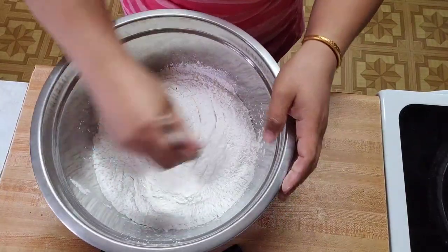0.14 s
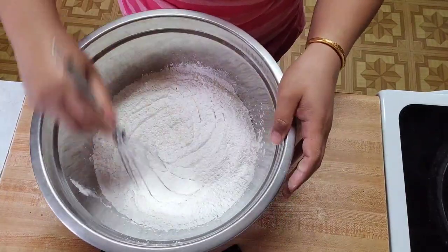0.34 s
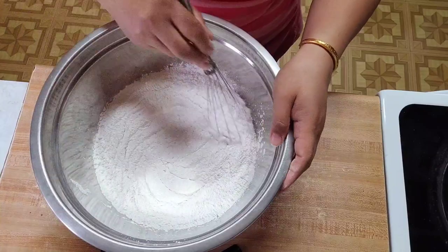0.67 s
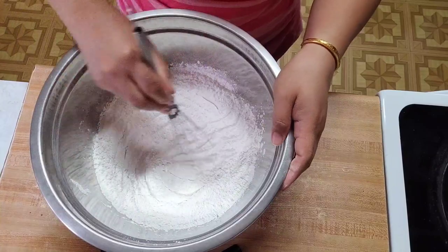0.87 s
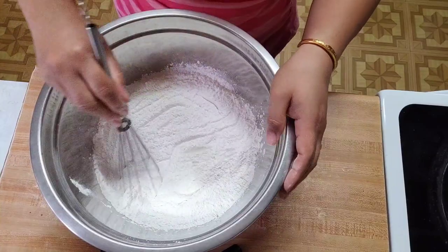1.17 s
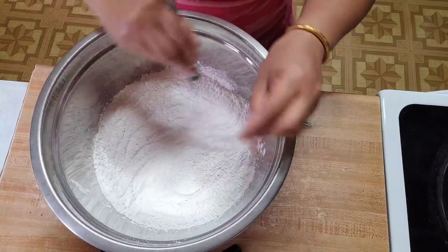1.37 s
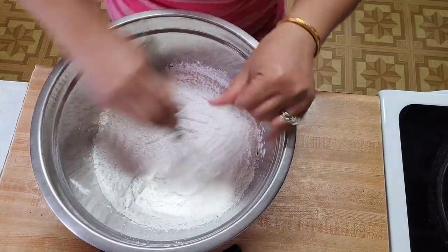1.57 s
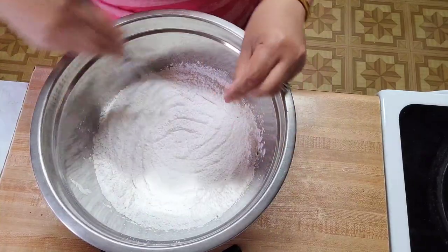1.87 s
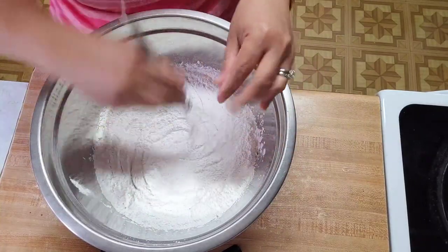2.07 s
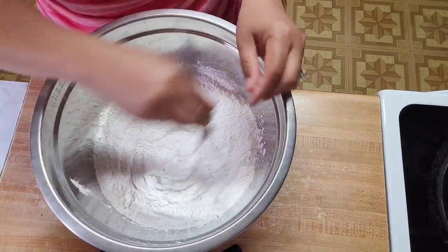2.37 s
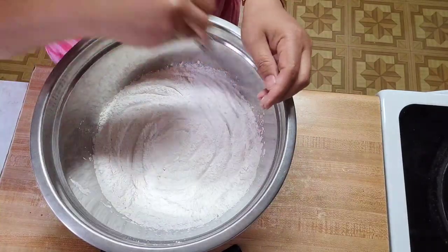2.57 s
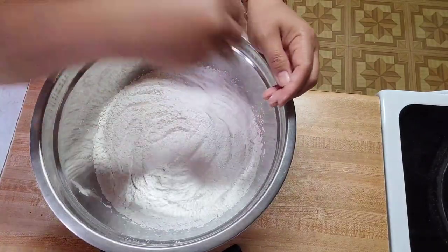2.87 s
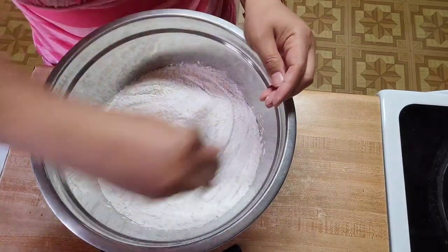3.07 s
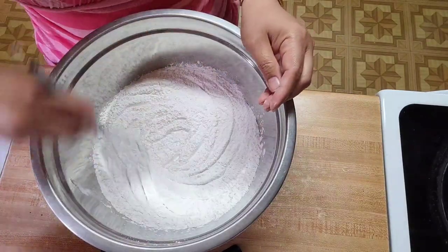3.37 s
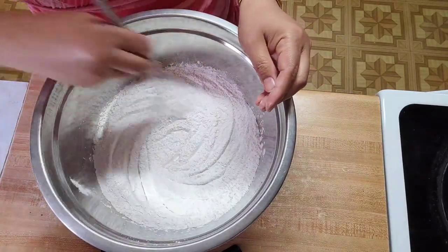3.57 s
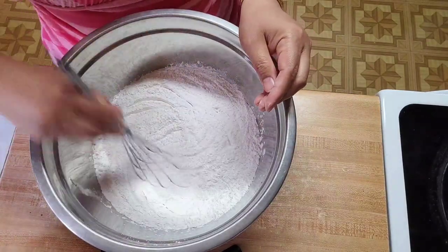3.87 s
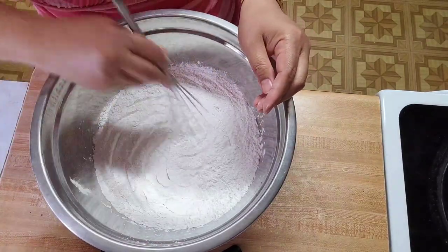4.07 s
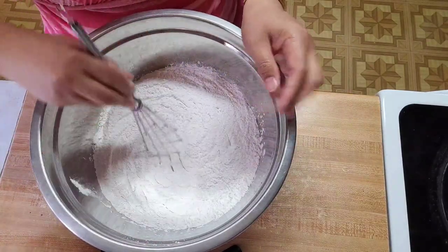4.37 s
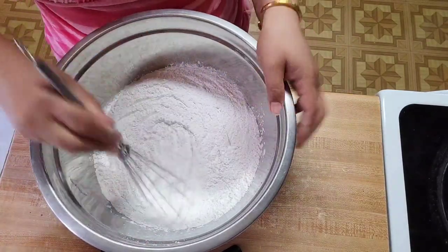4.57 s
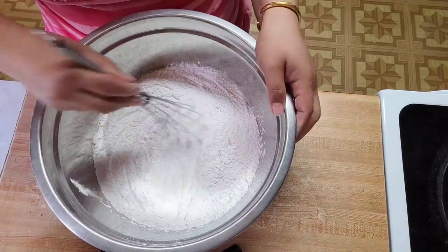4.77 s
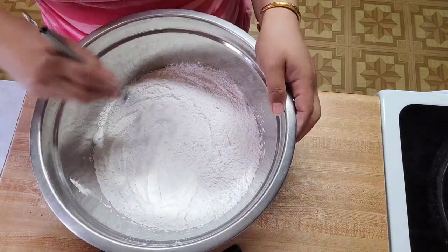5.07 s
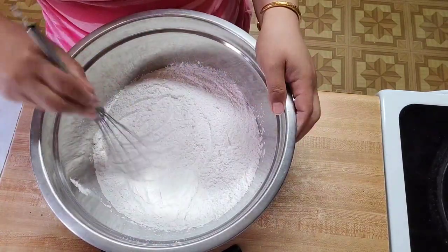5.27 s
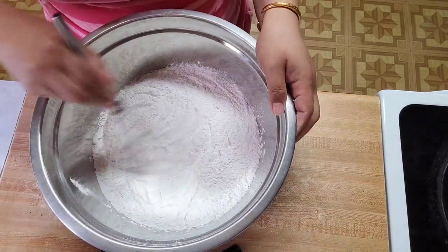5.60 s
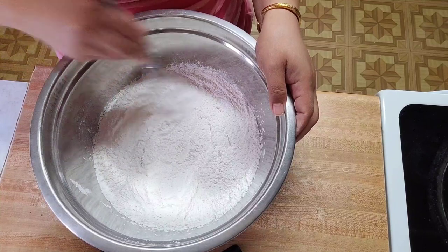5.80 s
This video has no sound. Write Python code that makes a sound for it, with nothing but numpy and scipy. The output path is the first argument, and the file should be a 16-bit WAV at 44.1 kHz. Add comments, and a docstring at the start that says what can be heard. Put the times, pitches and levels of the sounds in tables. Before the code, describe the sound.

A wire whisk stirs dry flour in a steel bowl, hissing softly, with irregular dull bowl knocks and bright metallic clicks.

```python
"""Wires hiss and scrape close by: a whisk circles through dry flour in a steel bowl on a wooden counter.
Random slips, filtered by flour, wire and bowl spectra, make the light drag and the louder swishes.
Hits add damped bowl modes, noise-burst taps and wire clicks with chatter; loops clink, the bowl rocks.
A small kitchen answers with decaying noise; sines under still air make an appliance hum."""
import sys
import numpy as np
from scipy import signal
from scipy.fft import rfft, irfft, next_fast_len
from scipy.io import wavfile
from scipy.ndimage import map_coordinates

SR = 44100
rng = np.random.default_rng(int(sys.argv[2]) if len(sys.argv) > 2 else 0)


def to_wav(sig):
    """Store sig (one row per channel, or 1-D mono) as 16-bit WAV at the path in sys.argv[1].

    Samples outside -1..1 are clipped; the rate is SR.
    """
    pcm = np.clip(np.atleast_2d(sig), -1, 1) * 32767
    pcm = np.round(pcm).astype(np.int16)
    wavfile.write(sys.argv[1], SR, pcm.T)  # frames by channels


N = 261948
AGE_S = np.arange(SR // 3) / SR  # time since a blow

# steel cracking on steel: freq_hz, level_db
CRACK_SPECTRUM = [(800, -12), (1500, -14.5), (2500, -8), (3500, -6.5), (4600, -1.5), (5800, 0), (7400, 6.5),
                  (8800, -3.5), (11300, 3), (14000, 1), (16000, 5)]
# whisk against wall, relative levels: start_s, knock_db, tap_db, click_db
WALL_HITS = [(0.181, -38, -54.5, -48.5), (0.358, -33.5, -47.5, -37.5), (0.517, -45.5, -88, -62),
             (0.932, -26.5, -43.5, -25), (1.206, -36.5, -64, -50.5), (1.348, -29.5, -56.5, -36.5),
             (1.606, -47, -69, -60), (1.704, -29.5, -41.5, -25.5), (1.959, -44, -57, -59.5),
             (2.203, -42, -53.5, -42), (2.481, -40, -66, -46.5), (3.105, -51.5, -65.5, -55),
             (3.229, -47.5, -59.5, -62), (3.353, -43.5, -73, -73), (3.504, -43.5, -61, -43.5),
             (3.571, -43, -71, -70), (3.812, -35.5, -43, -34.5), (4.303, -31, -44, -38),
             (4.712, -31.5, -60, -36), (4.81, -33, -55, -37.5), (5.137, -34.5, -50, -54),
             (5.425, -40.5, -56.5, -48.5), (5.533, -38, -61.5, -60), (5.787, -36.5, -54, -39.5),
             (5.836, -35.5, -50, -44), (5.901, -45, -66, -65)]


def amp(db):
    """Decibels to gain."""
    return 10 ** (np.asarray(db) / 20)


def unit(x):
    """Scale to rms 1."""
    return x / np.sqrt(np.mean(x ** 2) + 1e-20)


def blow(x):
    """Scale a blow to the energy of 10 ms at rms 1."""
    energy_ratio = np.mean(x ** 2) * x.shape[-1] / (SR * 0.01)
    return x / np.sqrt(energy_ratio + 1e-20)


def along(points, hz):
    """Interpolate (Hz, value) points on a log-frequency axis."""
    f, v = np.transpose(points)
    return np.interp(np.log(hz + 1), np.log(f), v)


def wobble(rate_hz):
    """Smooth random curve with rate_hz knots a second."""
    knots = rng.standard_normal(int(N * rate_hz / SR) + 4)
    return map_coordinates(knots, [np.arange(N) * rate_hz / SR])


def filtered(x, response):
    """Multiply the spectrum of x by a response of frequency."""
    n = x.shape[-1]
    m = next_fast_len(n + SR // 8)
    return irfft(rfft(x, m) * response(np.fft.rfftfreq(m, 1 / SR)), m)[..., :n]


def spread(pair):
    """Mix two signals to left and right; unrelated inputs get the tabled correlation."""
    # stereo correlation: freq_hz, likeness (0-1)
    likeness = [(60, 0.51), (250, 0.94), (550, 0.72), (1200, 0.097), (4000, 0.22), (12000, 0.054)]

    def mid_side_gains(hz):
        turn = np.arccos(np.clip(along(likeness, hz), 0, 1)) / 2
        return np.array([np.cos(turn), np.sin(turn)])

    mid, side = filtered(pair, mid_side_gains)
    return np.array([mid + side, mid - side])


def coloured(pair, spectrum):
    """Shape a pair by a (Hz, dB) spectrum, in stereo, at rms 1."""
    return unit(spread(filtered(pair, lambda hz: amp(along(spectrum, hz)))))


def resonances(peaks, hz):
    """Complex response of a body with (Hz, width Hz, dB) resonances of alternating sign."""
    total = 0
    for k, (centre_hz, width_hz, db) in enumerate(peaks):
        damping = 1j * hz * width_hz
        total = total + (-1) ** k * amp(db) * damping / (centre_hz ** 2 - hz ** 2 + damping)
    return total


def ripple(hz, depth_db, step_hz):
    """Random uneven response: every spot struck favours other frequencies."""
    knots = rng.standard_normal(400)
    return amp(depth_db * map_coordinates(knots, [hz / step_hz], order=1, mode="mirror"))


def burst(spectrum, attack_s, t60_s):
    """Decaying coloured noise: resonances too dense to tell apart."""
    noise = coloured(rng.standard_normal((2, len(AGE_S))), spectrum)
    return blow(noise * (1 - np.exp(-AGE_S / attack_s)) * amp(-60 * AGE_S / t60_s))


def ring(modes, attack_s, scatter_db, detune):
    """Damped sine modes; each blow lands elsewhere, so strengths and pitches vary."""
    hz, db, t60_s = np.transpose(modes)[..., None]
    size, shift, sign = rng.standard_normal((3, len(modes), 1))
    waves = np.sign(sign) * np.sin(2 * np.pi * hz * (1 + detune * shift) * AGE_S)
    decay = amp(db + scatter_db * size - 60 * AGE_S / t60_s)
    return blow(np.sum(waves * decay, 0) * (1 - np.exp(-AGE_S / attack_s)))


def grains(rate_hz, scatter_db):
    """Random tiny slips, simultaneous in two channels, with uneven sizes and signs."""
    chance, size, sign = rng.random(N), rng.standard_normal(N), rng.standard_normal((2, N))
    return (chance < rate_hz / SR) * amp(scatter_db * size) * sign


def add(track, start_s, sound):
    """Mix a sound into the track at start_s."""
    room = track[:, max(round(start_s * SR), 0):][:, :sound.shape[-1]]
    room += sound[..., :room.shape[1]]


def background():
    """Still kitchen air as coloured noise; appliance hum as sines with slight phase drift."""
    # still air: freq_hz, level_db
    air_spectrum = [(20, -24), (32, -2), (50, 1), (85, -1), (160, -6.5), (280, -0.5), (500, -7),
                    (800, -20.5), (1200, -33.5), (2000, -37), (5000, -50.5), (7000, -41.5), (9000, -45.5),
                    (16000, -38)]
    # appliance motor: freq_hz, relative_rms_db
    hum_partials = [(59.3, -54.5), (120, -70)]
    t = np.arange(N) / SR
    hum = np.zeros(N)
    for hz, db in hum_partials:
        phase = 2 * np.pi * hz * t + 0.073 * wobble(4.1)
        hum += amp(db) * np.sqrt(2) * np.sin(phase)
    return hum + amp(-61.0) * coloured(rng.standard_normal((2, N)), air_spectrum)


def kitchen(x):
    """Wall reflections as a noise tail, each frequency dying at its own speed."""
    # room decay: freq_hz, t60_s
    room_decay = [(100, 0.32), (500, 0.25), (2000, 0.31), (7000, 0.2), (15000, 0.24)]
    hz, t, z = signal.stft(rng.standard_normal((2, SR // 2)), SR, nperseg=256)
    decay = amp(-60 * t / along(room_decay, hz)[:, None])
    tail = signal.istft(z * decay, SR, nperseg=256)[1]
    tail = spread(tail / np.linalg.norm(tail[0]))
    late = np.pad(x.mean(0), (SR // 150, 0))  # 6.7 ms pre-delay
    return signal.fftconvolve(late[None], tail, axes=1)[:, :N]


def thump(db):
    """Bowl on counter: low damped modes with a slow onset."""
    # bowl rocking on counter: freq_hz, level_db, t60_s
    counter_modes = [(52.3, -15, 0.033), (65, 4.5, 0.17), (127, -6.5, 0.16)]
    return amp(db + 3.5) * ring(counter_modes, attack_s=0.005, scatter_db=1.5, detune=0.05)


def knock(db, tilt_db):
    """Dull bowl note: damped modes plus a thud, with tilt_db applied to the upper modes."""
    # bowl damped by flour and hand: freq_hz, level_db, t60_s
    bowl_modes = [(190.5, -8, 0.069), (277.6, -4.5, 0.1), (325, -8, 0.038), (369.5, 0, 0.092),
                  (418.7, -5.5, 0.049), (506, -4, 0.082), (577, 2, 0.049), (628, -6.5, 0.052),
                  (718.5, -11, 0.062), (888, -21, 0.055)]
    # dense part of the knock: freq_hz, level_db
    thud_spectrum = [(80, -27), (190, 0), (370, -8.5), (600, -5), (800, -7.5), (1050, -21), (3000, -34.5)]
    note = ring(bowl_modes, attack_s=0.0011, scatter_db=3.5, detune=0.029)
    note = note + amp(-5.0) * burst(thud_spectrum, attack_s=0.0012, t60_s=0.071)
    tilt = lambda hz: amp(tilt_db * along([(380, 0.047), (520, 0.96)], hz))
    return amp(db - 4.0) * blow(filtered(note, tilt))


def tap(db):
    """Hard wire-on-wall contact: a noise burst coloured by the spot struck."""
    # wire on wall: freq_hz, level_db
    contact_spectrum = [(500, -17), (900, 3.5), (1500, 7.5), (2100, -5), (2800, -8), (4500, -20),
                        (9000, -9.5)]
    spot = lambda hz: ripple(hz, depth_db=2.5, step_hz=125)
    return amp(db - 4.5) * filtered(burst(contact_spectrum, attack_s=0.0005, t60_s=0.1), spot)


def click(db, top_db, chatter_db):
    """Steel on steel: sharp bite and crack, ringing loops, then slower-rising chatter."""
    # wire loops: freq_hz, level_db, t60_s
    loop_modes = [(2479, -23, 0.18), (3480, 3.5, 0.08), (4650, 0.5, 0.033), (5030, -26, 0.033),
                  (6520, -9, 0.04), (7070, -14, 0.049), (7080, 10, 0.062), (7540, 6, 0.07),
                  (10300, -10, .05), (11036, 25.5, 0.12), (11700, -6, .05), (13400, -9, 0.032)]
    bite = amp(-8.5) * burst(CRACK_SPECTRUM, attack_s=0.00018, t60_s=0.029)
    crack = amp(-8.0) * burst(CRACK_SPECTRUM, attack_s=0.0015, t60_s=0.066)
    loops = np.array([ring(loop_modes, attack_s=0.0005, scatter_db=5, detune=0.0075) for _ in range(2)])
    chatter = amp(chatter_db) * burst(CRACK_SPECTRUM, attack_s=0.021, t60_s=0.18)

    def colour(hz):
        tilt_db = top_db * along([(4000, -0.69), (7500, 0.64), (10500, 0.83)], hz)
        return amp(tilt_db) * ripple(hz, depth_db=2.0, step_hz=379)

    return amp(db) * filtered(bite + crack + amp(-17.5) * spread(loops) + chatter, colour)


def contacts():
    """Hits excite bowl, counter and wires; clinks the wires alone; rocking the bowl and counter."""
    # loops against each other: start_s, relative_level_db
    clinks = [(0.284, -60), (0.503, -53), (0.76, -45), (2.171, -48), (2.882, -54.5), (2.994, -42),
              (3.231, -40.5), (3.344, -48), (3.406, -49)]
    # pushes rocking the bowl: start_s, relative_thump_db
    rocks = [(0.85, -46), (1.312, -45.5), (1.649, -46.5), (2.21, -40.5), (3.749, -37.5), (3.786, -41.5),
             (4.212, -40), (4.259, -45.5), (4.436, -52), (4.713, -38)]
    track = np.zeros((2, N))
    for s, knock_db, tap_db, click_db in WALL_HITS:
        # flour softens the tap and dulls the upper bowl modes with it; bare steel from -56 dB
        tilt_db = -3 + 0.52 * min(tap_db + 56, 0)
        add(track, s, knock(knock_db, tilt_db) + tap(tap_db) + thump(knock_db - 12))
        # wires click 3 ms later, treble dulled by flour
        add(track, s + 0.003, click(click_db, top_db=-6.5, chatter_db=-16.5))
    for s, db in clinks:
        add(track, s, click(db, top_db=1, chatter_db=-12.5))  # bare wire is bright
    for s, db in rocks:
        # a push hardly stirs the upper modes
        add(track, s, thump(db) + knock(db - 9, tilt_db=-5))
    return track


def powder_hiss(pressure):
    """Wires shear powder: dense slips with the flour's spectrum, swelling with pressure."""
    # sheared flour: freq_hz, level_db_per_hz
    flour_spectrum = [(300, -28), (1200, -20), (2500, -20), (4000, -21), (6000, -8.5), (7600, -6.5),
                      (8700, -9), (10500, -5.5), (12300, -3), (14000, -4), (16000, -7)]
    powder = grains(rate_hz=5000, scatter_db=3)
    return coloured(powder, flour_spectrum) * amp(1.5 + 1.46 * pressure)


def ticks(rate_hz):
    """A sliding wire catches and snaps free at random moments; rms 1."""
    snap = burst(CRACK_SPECTRUM, attack_s=0.00023, t60_s=0.015)
    return unit(signal.fftconvolve(grains(rate_hz, scatter_db=6.5)[:1], snap, axes=1)[:, :N])


def steel_scrape(pressure):
    """Slips ring the steel resonances under a sliding wire; sparse ticks on top."""
    # steel under a wire: freq_hz, width_hz, level_db
    steel_peaks = [(4517, 68, 2.5), (5410, 1760, -3.5), (6070, 173, 4), (6310, 370, -2.5),
                   (7220, 170, -3.5), (7476, 270, -11.5), (7413, 350, 3.5)]
    slips = grains(rate_hz=3000, scatter_db=2.0)
    scrape = unit(spread(filtered(slips, lambda hz: resonances(steel_peaks, hz))))
    return scrape * amp(0.46 + 0.38 * pressure) + amp(-11.5) * ticks(rate_hz=37)


def bowl_grit(pressure):
    """Slips ring the wall as grit and the bowl as a lower rub."""
    # bowl wall under a wire: freq_hz, width_hz, level_db
    wall_peaks = [(1115, 100, -1.5), (1294, 47, 4.5), (1500, 140, -7.5), (1960, 540, -9), (2825, 134, -4),
                  (3485, 99, 2.5), (4320, 250, -0.5)]
    # rubbed bowl: freq_hz, level_db
    rub_spectrum = [(60, -38), (130, 1), (200, -3), (310, 5), (450, -3), (620, -2.5), (900, -12),
                    (1400, -35), (3000, -42), (8000, -47)]
    slips = grains(rate_hz=1500, scatter_db=-2)
    grit = unit(spread(filtered(slips, lambda hz: resonances(wall_peaks, hz))))
    rub = coloured(grains(rate_hz=2500, scatter_db=4.0), rub_spectrum)
    rub_db = 5.5 + 1.3 * pressure + 1.5 * wobble(25.4)
    return grit * amp(-3.0 + 1.0 * pressure) + rub * amp(rub_db)


def stirring():
    """Light drag, swishes and after-hit skids gate the same hiss, scrape and grit."""
    # swishes: peak_s, relative_hiss_db, length_s, scrape_offset_db
    swishes = [(0.01, -72, 0.034, 8), (0.307, -68, 0.065, 6), (0.586, -62, 0.062, -4),
               (1.004, -58, 0.033, -22), (1.434, -78, 0.049, 0), (1.634, -68.5, 0.17, -4),
               (1.762, -67.5, 0.067, 3), (1.926, -56, 0.058, -8), (2.056, -59, 0.049, -24),
               (2.191, -51.5, 0.04, -6.5), (2.345, -68, 0.072, -37), (2.506, -46.5, 0.026, -7),
               (2.613, -49, 0.082, -8), (2.948, -75.5, 0.089, 11), (3.112, -48.5, 0.063, -6.5),
               (3.256, -48, .042, -3), (3.463, -60, .035, -5), (3.552, -53.5, 0.038, -4.5),
               (3.894, -68.5, 0.25, -4.5), (4.443, -66.5, 0.047, -6.5), (4.535, -69, 0.038, -4.5),
               (5.497, -55, 0.063, -2.5), (5.847, -59.5, 0.06, -8)]
    # drag between swishes: time_s, relative_level_db
    drag_curve = [(0.0, -70.5), (0.48, -63), (1.19, -77), (1.85, -68), (2.45, -83.5), (2.58, -69),
                  (3.32, -59), (3.67, -67.5), (3.95, -69), (5.19, -85), (5.84, -82), (5.94, -59)]
    rise_share, fall_share = 0.67, 1.047  # shares of length to -10 dB
    usual_hiss_db, grit_offset_db, grit_growth = -61, -8, 0.47  # grit grows more slowly than hiss
    pressure = wobble(70)  # one loop after another digs in
    hiss, scrape, grit = powder_hiss(pressure), steel_scrape(pressure), bowl_grit(pressure)
    now_s = np.arange(N) / SR
    drag = amp(np.interp(now_s, *np.transpose(drag_curve)) - 6.5)
    track = drag * (hiss + amp(-1) * scrape + amp(-6) * grit)
    # wires skid on 32 ms after each hit
    skids = [(s + 0.032, knock_db - 37, 0.04, -1.5) for s, knock_db, _, _ in WALL_HITS]
    for s, db, length_s, steel_db in swishes + skids:
        part = slice(max(round(s * SR) - SR // 4, 0), round(s * SR) + SR // 3)
        t = (now_s[part] - s) / length_s
        rise = np.abs(t / rise_share) ** 2.6
        fall = np.abs(t / fall_share) ** 1.53
        swell = amp(-10 * np.where(t < 0, rise, fall))
        grit_db = usual_hiss_db + grit_offset_db + grit_growth * (db + steel_db - usual_hiss_db)
        stroke = amp(db) * hiss[:, part] + amp(db + steel_db) * scrape[:, part]
        stroke = stroke + amp(grit_db) * grit[:, part]
        track[:, part] += filtered(swell * stroke, lambda hz: ripple(hz, depth_db=2.5, step_hz=257.7))
    return track


def scene():
    """Whisk, room and background; direct sound arrives right first, and the right is louder overall."""
    # stereo lean of whisk and room: freq_hz, extra_left_re_right_db
    lean = [(250, 2.5), (500, 1), (1500, 1.2), (3000, 2), (5000, 2), (7500, -3), (10000, 1)]
    lag_s, left_re_right_db = 3 / SR, -3.03
    sides = np.array([[0.5], [-0.5]])  # left, right
    whisk = stirring() + contacts()
    direct = filtered(whisk, lambda hz: np.exp(-2j * np.pi * hz * lag_s * sides))
    sound = filtered(direct + amp(-8.5) * kitchen(whisk), lambda hz: amp(along(lean, hz) * sides))
    return (sound + background()) * amp(left_re_right_db * sides)


def record(dry):
    """Attenuate bass below 36 Hz and remove everything from 15.85 kHz up."""
    low_cut = signal.butter(3, 36, "highpass", fs=SR, output="sos")
    return filtered(signal.sosfilt(low_cut, dry), lambda hz: hz < 15850)


dry = scene()
out = record(dry)
to_wav(out)
```